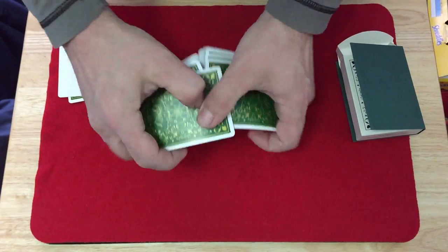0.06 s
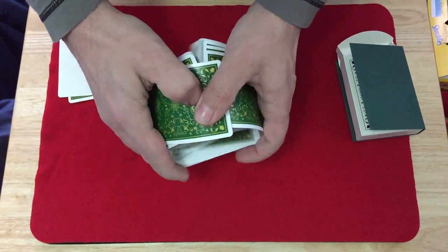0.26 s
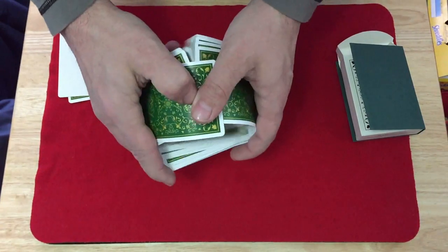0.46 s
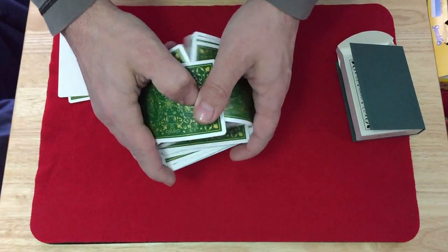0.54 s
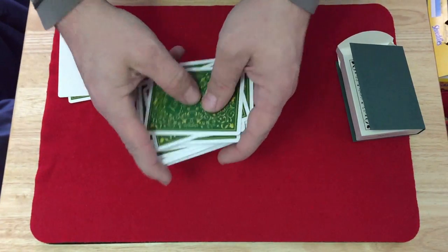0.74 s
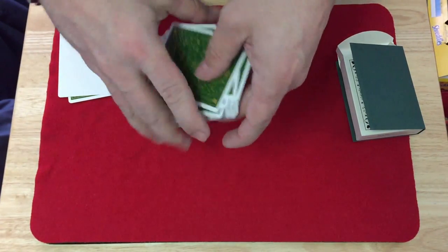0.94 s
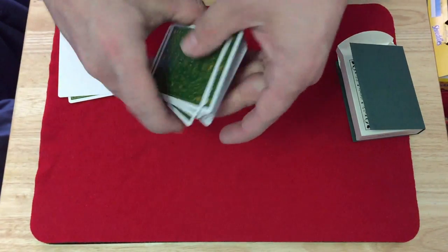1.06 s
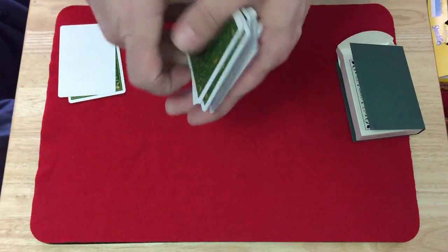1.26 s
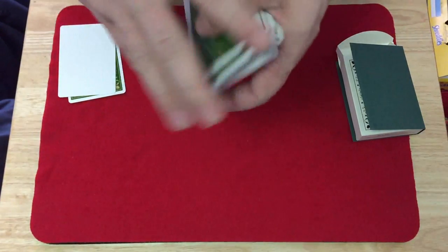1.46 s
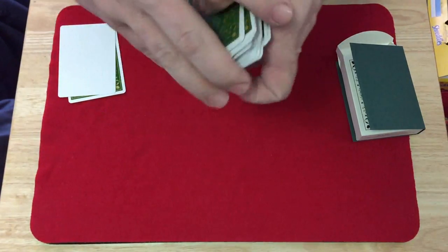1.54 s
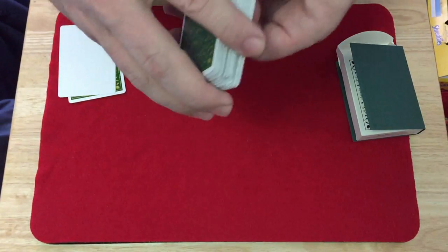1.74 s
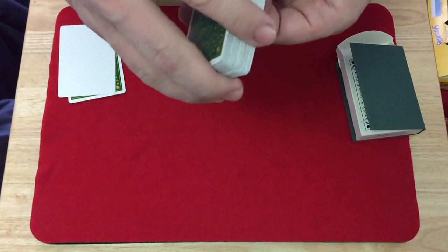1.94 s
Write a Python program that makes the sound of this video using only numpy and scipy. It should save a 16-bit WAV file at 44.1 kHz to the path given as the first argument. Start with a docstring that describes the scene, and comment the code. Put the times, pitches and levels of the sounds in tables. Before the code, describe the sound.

Card riffle: a fast, crisp papery purr of snapping edges, followed by soft slides and taps

```python
"""In a small room, close to the microphone, a riffled deck of paper cards is let go over a cloth mat.
The cascade is friction noise of sliding faces, a patter of flicking edges (noise bursts and damped modes),
snaps where clumps break free (a crack, then ringing modes) and knocks of packets landing on the mat.
Hands push the deck square: slides are filtered friction noise with a singing edge, taps are damped modes.
Skin brushing the mat, hollow-coloured rubbing of the deck and steady air noise lie beneath."""
import sys
import numpy as np
from scipy import signal
from scipy.fft import rfft, irfft, next_fast_len
from scipy.io import wavfile

SR = 44100
rng = np.random.default_rng(int(sys.argv[2]) if len(sys.argv) > 2 else 0)


def inscribe(sig):
    """Save sig as 16-bit PCM at rate SR to the path in sys.argv[1].

    A 1-D sig is mono; a 2-D sig holds one channel per row.
    Samples are clipped to [-1, 1] before scaling.
    """
    pcm = np.round(np.clip(np.atleast_2d(sig).T, -1, 1) * 32767)
    wavfile.write(sys.argv[1], SR, pcm.astype(np.int16))


N = 88200

# spectrum of rubbing card faces, also of the cracks of the snaps: [f/Hz, relative level/dB]
FACE_SPECTRUM = [(100, -18.5), (500, -5), (850, -8.5), (1300, 4), (1800, 0.5), (2500, 4.5), (3000, 0.5),
                 (3500, 5), (4700, 1.5), (6500, 2), (8400, -1.5), (10400, -6.5), (12000, -5), (15500, -11)]
MODE_RISE_S = 0.00077  # time constant of the onset of most damped modes


def undb(db):
    """Convert a level in decibels to an amplitude ratio."""
    return 10 ** (np.asarray(db) / 20)


def unit(x):
    """Normalize to an rms value of 1."""
    return x / np.sqrt(np.mean(x ** 2))


def clock():
    """Time of each sample in seconds."""
    return np.arange(N) / SR


def curve(points):
    """Amplitude envelope, linear in level between [t/s, level/dB] points."""
    at, db = np.array(points).T
    return undb(np.interp(clock(), at, db, left=-120, right=-120))


def colour(x, points, tilt_db=0):
    """Minimum-phase filter through [f/Hz, level/dB] points, tilted in dB per octave, with unit power gain."""
    size = next_fast_len(2 * len(x), real=True)
    size += size % 2
    octave = np.log2(np.maximum(np.fft.rfftfreq(size, 1 / SR), 1))
    hz, db = np.array(points).T
    level_db = np.interp(octave, np.log2(hz), db)
    level_db += tilt_db * np.maximum(octave, np.log2(hz[0]))  # no tilt below the first point
    gain = unit(undb(level_db))
    # folding the cepstrum onto positive times makes the filter causal
    cepstrum = irfft(np.log(gain))
    cepstrum[1:size // 2] *= 2
    cepstrum[size // 2 + 1:] = 0
    return irfft(rfft(x, size) * np.exp(rfft(cepstrum)))[:len(x)]


def above(x, hz, order=6):
    """High-pass (Butterworth): a small body radiates little below a limiting frequency."""
    return signal.sosfilt(signal.butter(order, hz, "highpass", fs=SR, output="sos"), x)


def burst(decay_s, points, size=4096):
    """Transient broadband noise: it builds quickly, decays exponentially and is coloured by a spectrum."""
    t = np.arange(size) / SR
    rise_s = 0.78 * decay_s
    shape = (1 - np.exp(-t / rise_s)) ** 2 * np.exp(-t / decay_s)
    return colour(rng.standard_normal(size) * shape, points)[:size]


def ring(hz, decay_s, rise_s, spread=0, size=8192):
    """A damped mode; uneven bending of the paper adds two weaker, detuned neighbours."""
    t = np.arange(size) / SR
    wave = np.sin(2 * np.pi * hz * t)
    if spread:
        for side in (-1, 1):
            detuned_hz = hz * (1 + side * spread * (1 + rng.random()))
            wave = wave + .5 * np.sin(2 * np.pi * detuned_hz * t + rng.random())
    return wave * (1 - np.exp(-t / rise_s)) ** 2 * np.exp(-t / decay_s)


def add(out, at, hit, db):
    """Superpose an impact, its level defined by its energy spread over 4 ms."""
    i = int(np.clip(at * SR, 0, N - 1))
    scale = undb(db) * np.sqrt(.004 * SR / np.sum(hit ** 2))
    out[i:i + len(hit)] += (hit * scale)[:N - i]


def friction():
    """Dry friction: paper fibres catch in dense tiny clicks over a smooth hiss."""
    grains_per_s, grain_spread_db, smooth_power_share = 5000, 4.5, 0.44
    caught = rng.random(N) < grains_per_s / SR
    strength = undb(grain_spread_db * rng.standard_normal(N))
    grains = caught * rng.choice([-1, 1], N) * strength
    smooth = rng.standard_normal(N)
    return np.sqrt(1 - smooth_power_share) * unit(grains) + np.sqrt(smooth_power_share) * smooth


def resonate(x, hz, decay_s):
    """Resonance: convolution with the response of one damped mode, at rms 1."""
    return unit(signal.fftconvolve(x, ring(hz, decay_s, MODE_RISE_S))[:N])


def air():
    """Stationary background noise of the air: random pressure with a sloping spectrum."""
    # spectrum of the air noise: [f/Hz, relative level/dB]
    air_spectrum = [(25, -14.5), (70, -1), (220, -5.5), (600, -13.5), (2000, -14.5), (15500, -22)]
    return undb(-73) * colour(rng.standard_normal(N), air_spectrum)


def hands():
    """Friction of skin on the mat, and of fingers on the deck, given a hollow colour by resonances."""
    # hands shifting over the mat: [t/s, level/dB]
    brushing = [(0, -55), (.06, -70.5), (.78, -72.5), (.93, -67.5), (1.1, -69), (1.35, -70.5), (1.55, -73),
                (2, -81)]
    # spectrum of skin on the mat: [f/Hz, relative level/dB]
    skin_spectrum = [(30, -22), (70, -9), (230, 1.5), (320, -0.5), (480, -13), (1500, -9.5), (15000, -39)]
    # fingers rubbing the deck, with a hollow colour: [t/s, level/dB]
    deck_rubbing = [(0, -64), (.2, -74.5), (.75, -69), (.9, -72), (1.06, -66.5), (1.24, -76), (1.36, -62),
                    (1.43, -69), (1.5, -79.5)]
    # resonances that give the hollow colour: [f/Hz, relative level/dB]
    hollow_modes = [(910, 0.5), (1190, 4), (1640, 3), (1780, -3), (2600, -4)]
    hollow_decay_s = 0.007
    hollow = unit(sum(undb(db) * resonate(friction(), hz, hollow_decay_s) for hz, db in hollow_modes))
    brush = colour(rng.standard_normal(N), skin_spectrum)
    return brush * curve(brushing) + hollow * curve(deck_rubbing)


def catching():
    """Stick-slip: the gain of sliding friction wanders at random."""
    spread_db, changes_per_s = 2.2, 190
    steps = clock() * changes_per_s
    return undb(spread_db * np.interp(steps, np.arange(N), rng.standard_normal(N)))


def slides():
    """Sliding friction swells until the cards meet the fingers, then dies away; the free edge resonates."""
    # light slides of card on card:
    # [t of peak/s, level/dB, rise/s, fall/s, treble tilt/(dB per octave), f of the free edge/Hz]
    strokes = [(.002, -62.5, 0.017, 0.021, 4.5, 1300), (0.122, -58, 0.005, .011, -2.5, 3260),
               (.165, -60.5, .07, 0.033, -9.5, 820), (.667, -34.5, 0.0071, 0.0091, 1.5, 3480),
               (.683, -35.5, .0066, .002, 14, 3460), (.74, -46, 0.0013, .0013, -5, 2800),
               (0.771, -61, 0.041, 0.039, -12, 2480), (0.814, -47.5, .006, .003, -9.5, 4060),
               (0.955, -65, .011, 0.0074, -5, 4270), (1.071, -55.5, 0.0051, 0.013, -5.5, 4250),
               (1.296, -54.5, .009, 0.021, -2.5, 4220), (1.315, -53, 0.014, 0.01, -2.5, 2100),
               (1.352, -59.5, 0.015, .03, -2, 2480), (1.58, -61, 0.019, 0.011, 1.5, 2000),
               (1.623, -54, 0.019, 0.012, -5, 2960), (1.634, -53, 0.0065, 0.0091, -1, 3900),
               (1.708, -56.5, 0.0055, 0.013, 3, 3420), (1.724, -51.5, 0.0065, 0.0058, -1.5, 4110)]
    # spectrum of a slide before its tilt: [f/Hz, relative level/dB]
    slide_spectrum = [(1500, -6), (2400, -4), (4200, 0), (5100, 0), (6600, 4), (8500, 5), (10300, -1.5),
                      (12200, 1.5), (15500, -5)]
    edge_decay_s, edge_db = 0.0013, -13  # the edge sings faintly, relative to the hiss
    cutoff_share = 0.96  # the hiss is weak below this share of the edge frequency
    out, t, stick_slip = np.zeros(N), clock(), catching()
    for at, db, rise_s, fall_s, tilt_db, hz in strokes:
        fibres = friction() * stick_slip
        swell = np.exp(-np.maximum((at - t) / rise_s, (t - at) / fall_s))
        hiss = unit(above(colour(fibres, slide_spectrum, tilt_db), cutoff_share * hz))
        edge = undb(edge_db) * resonate(fibres, hz, edge_decay_s)
        out += undb(db) * swell * (hiss + edge)
    return out


def taps():
    """Modal excitation: a tap on the edge of the held deck rings a main mode and, by its own share, others."""
    # taps: [t/s, level/dB, f of the main mode/Hz, level of the other modes/dB]
    tap_events = [(.004, -56.5, 1400, -20), (1.35, -58.5, 1247, -2), (1.5745, -59.5, 1750, -6),
                  (1.627, -58.5, 1696, -14), (1.7201, -47, 1005, -3), (1.736, -61, 996, -5.5),
                  (1.749, -65, 944, -8)]
    # other modes of the deck: [multiple of the main f, relative level/dB, decay/s]
    deck_modes = [(.64, -11, 0.0034), (1.45, -5, 0.0036), (1.93, -11.5, 0.0043), (3.3, -12.5, 0.0034),
                  (4.05, -21, 0.0046)]
    decay_s, rise_s, lowest_hz = 0.0025, .0005, 556
    out = np.zeros(N)
    for at, db, hz, others_db in tap_events:
        others = sum(undb(mode_db) * ring(hz * ratio, mode_decay_s, rise_s)
                     for ratio, mode_db, mode_decay_s in deck_modes)
        add(out, at, ring(hz, decay_s, rise_s) + undb(others_db) * others, db)
    return above(out, lowest_hz)


def snaps():
    """Release of bending energy: a clump's edge cracks or scrapes, and the bent card and the packet ring."""
    # cards and clumps breaking free: [t/s, crack level/dB, f of the bent card/Hz, card ring level/dB,
    # packet ring level/dB, decay of crack and card/s]
    snap_events = [(.127, -53, 3970, -52, -57.5, 0.0027), (.2805, -30.5, 2360, -46, -42.5, 0.0023),
                   (0.2855, -34, 3360, -48.5, -44, 0.0014), (.2958, -33.5, 3490, -36.5, -38.5, 0.002),
                   (.3098, -39.5, 6700, -32.5, -44.5, 0.0017), (.329, -35, 4390, -31.5, -39.5, 0.0031),
                   (0.3542, -35, 3520, -46, -34.5, 0.0026), (.386, -32.5, 3410, -34.5, -39, .002),
                   (0.421, -34, 2180, -29, -45, 0.00035), (0.443, -35, 5960, -38.5, -34, 0.0044),
                   (0.451, -29.5, 3140, -27.5, -40, 0.0014), (0.475, -39, 4290, -29.5, -36, 0.0013),
                   (0.4805, -34, 2440, -30, -28.5, 0.0012), (.506, -47, 3260, -35.5, -39.5, 0.0017),
                   (.5323, -33, 3700, -32.5, -35.5, 0.00042), (.539, -37, 2427, -25.5, -27, 0.0012),
                   (.552, -38.5, 3484, -35, -40.5, .002), (.596, -44, 3310, -34.5, -42, 0.0022),
                   (0.6089, -32, 3005, -26.5, -39.5, 0.0011), (0.6174, -33.5, 2340, -38, -29, 0.00074),
                   (.6325, -31.5, 3487, -31.5, -35, 0.0035), (.64, -37.5, 2847, -33, -64.5, 0.0039),
                   (0.696, -40.5, 1076, -46.5, -63, 0.0012)]
    packet_hz, packet_decay_s, packet_lag_s = 1328, 0.0013, 0.00072  # it answers just after the crack
    card_spread, packet_spread = .09, 0.041  # least detuning of the neighbouring modes, share of f
    lowest_hz = 850
    out = np.zeros(N)
    for at, crack_db, hz, card_db, packet_db, decay_s in snap_events:
        add(out, at, burst(decay_s, FACE_SPECTRUM), crack_db)
        add(out, at, ring(hz, decay_s, decay_s, card_spread), card_db)
        packet = ring(packet_hz, packet_decay_s, MODE_RISE_S, packet_spread)
        add(out, at + packet_lag_s, packet, packet_db)
    return above(out, lowest_hz)


def cascade():
    """Friction of card faces, and edges flicking past unevenly, each a noise burst with its own damped mode."""
    # sliding of the faces: [t/s, level/dB]
    sliding = [(.195, -68), (.224, -44.5), (.25, -39), (.286, -35), (.345, -38), (.40, -38.5), (.43, -37),
               (.475, -38), (.52, -39.5), (.555, -37.5), (.588, -42), (.615, -36.5), (.65, -40.5),
               (.683, -33.5), (.703, -53), (.73, -76), (.80, -62), (.86, -75)]
    # spectrum of a flicking card edge: [f/Hz, relative level/dB]
    edge_spectrum = [(60, -10.5), (300, -12.5), (820, -11.5), (1000, 1.5), (1330, 10.5), (1800, -8.5),
                     (2480, 5), (2900, -10.5), (3400, 14.5), (4100, 3), (6500, -7), (8500, 4), (10500, -22),
                     (15500, -20)]
    start_s, end_s, flicks_per_s = .268, .66, 170
    jitter = .5  # largest shift either way, share of the flick interval
    flick_db, spread_db, flick_decay_s = -42.5, 4, .0009
    mode_hz, spread_octaves, mode_db, mode_decay_s = 3143, 0.643, 0.5, 0.001  # mode level relative to the burst
    out = colour(friction(), FACE_SPECTRUM) * curve(sliding)
    for at in np.arange(start_s, end_s, 1 / flicks_per_s):
        late, strength, pitch = rng.uniform(-1, 1, 3)
        start = at + jitter * late / flicks_per_s
        db = flick_db + spread_db * strength
        add(out, start, burst(flick_decay_s, edge_spectrum, size=1024), db)
        card_hz = mode_hz * 2 ** (spread_octaves * pitch)
        add(out, start, ring(card_hz, mode_decay_s, MODE_RISE_S), db + mode_db)
    return out


def thuds():
    """Impact: landing packets excite short hollow modes, and the table rumbles in a low band under the hands."""
    # packets landing on the mat: [t/s, level/dB]
    landings = [(.2825, -41.5), (.2945, -40.5), (0.4046, -33), (0.4209, -41.5), (0.4279, -45), (.617, -41),
                (.6847, -44.5), (.696, -48)]
    # modes of a landing: [f/Hz, relative level/dB, decay/s]
    landing_modes = [(324, -3.5, 0.0016), (500, 2, 0.0013), (1210, 0, 0.0021)]
    # soft rumbles of the table: [t of peak/s, level/dB, time constant of swell and fade/s]
    rumbles = [(.375, -59, 0.062), (0.69, -55.5, 0.008), (0.941, -63, 0.032)]
    lowest_hz, rumble_band_hz = 150, (60, 209.6)
    knocks, t = np.zeros(N), clock()
    for at, db in landings:
        knock = sum(undb(mode_db) * ring(hz, decay_s, MODE_RISE_S) for hz, mode_db, decay_s in landing_modes)
        add(knocks, at, knock, db)
    band = signal.butter(2, rumble_band_hz, "bandpass", fs=SR, output="sos")
    rumble = unit(signal.sosfilt(band, rng.standard_normal(N)))
    pressure = sum(undb(db) * np.exp(-np.abs(t - at) / swell_s) for at, db, swell_s in rumbles)
    return above(knocks, lowest_hz, order=2) + pressure * rumble


def room(x):
    """Reverberation: quick reflections from hands and table, then the exponential tail of the room."""
    # spectrum of the tail: [f/Hz, relative level/dB]
    tail_spectrum = [(100, 1), (1000, -2.5), (3000, 4.5), (6000, -3.5), (15000, -7)]
    early_db, early_decay_s, late_db, late_t60_s = -9, 0.015, -18, 0.37
    t = clock()[:N // 4]
    early = rng.standard_normal(len(t)) * np.exp(-t / early_decay_s) * (t > .0015)
    late = rng.standard_normal(len(t)) * np.exp(-np.log(1000) * t / late_t60_s) * (t > .008)
    late = unit(colour(late, tail_spectrum))
    echo = (undb(early_db) * unit(early) + undb(late_db) * late) / np.sqrt(len(t))
    return x + signal.fftconvolve(x, echo)[:N]


def scene():
    """Superposition: the cards reverberate; the hands and the air are added directly."""
    cards = room(slides() + taps() + snaps() + cascade() + thuds())
    return (cards + hands() + air())[None]


def record(dry):
    """Band limitation: the recorder cuts steeply above 15680 Hz with an elliptic low-pass."""
    return signal.sosfilt(signal.ellip(12, .1, 80, 15680, fs=SR, output="sos"), dry)


dry = scene()
out = record(dry)
inscribe(out)
```